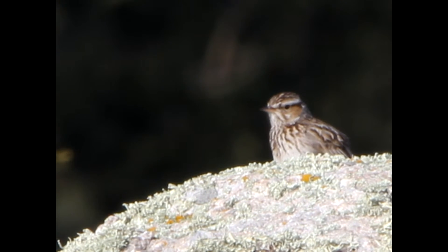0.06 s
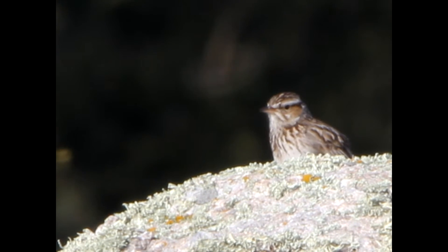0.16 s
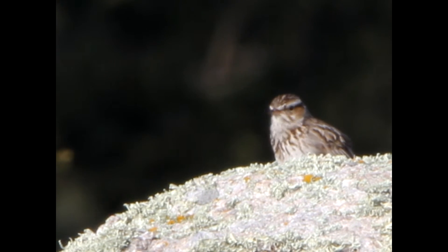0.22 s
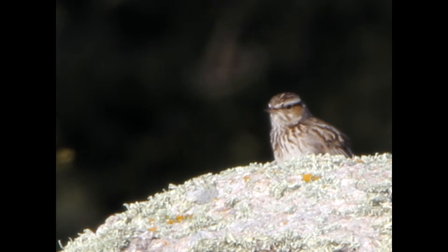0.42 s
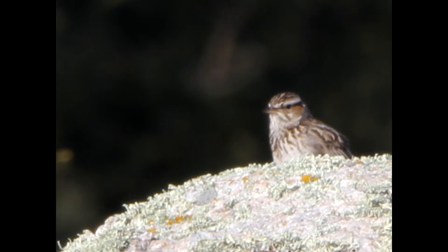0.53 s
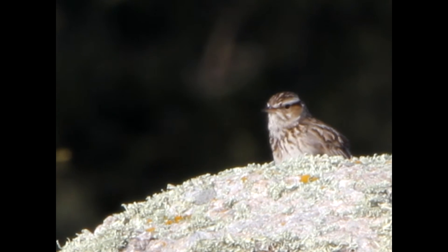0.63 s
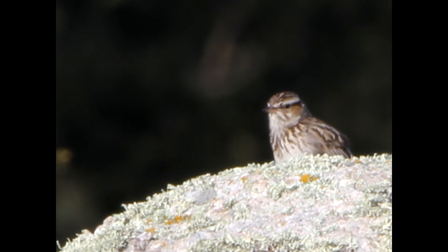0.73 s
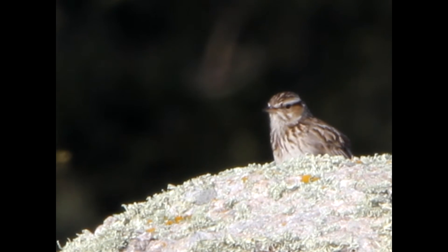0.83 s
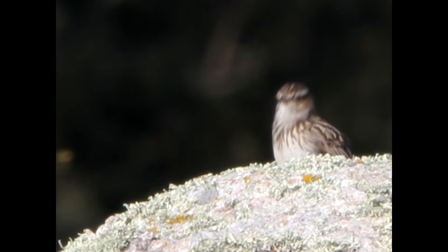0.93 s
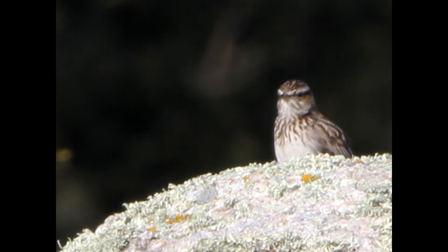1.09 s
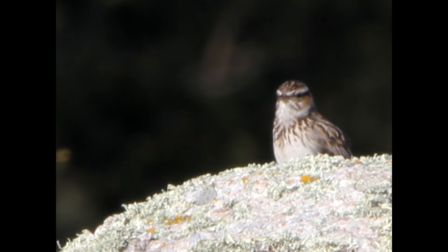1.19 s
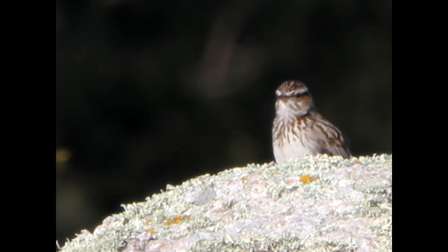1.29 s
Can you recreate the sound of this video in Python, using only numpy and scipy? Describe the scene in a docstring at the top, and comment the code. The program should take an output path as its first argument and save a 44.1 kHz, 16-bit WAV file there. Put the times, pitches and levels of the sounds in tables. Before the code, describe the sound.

A songbird sings short down-slurred whistles outdoors while wind softly bumps the microphone.

```python
"""A woodlark on a rock sings a rising whistle, then a run of down-slurred notes, each led in by a flick.
Each side of its syrinx is an oscillator of gliding pitch; the two sometimes sound together, and in
the opening whistle they mix to give a sum tone. Rocks and bushes scatter faint echoes.
Eddies of wind bump the microphone as pressure pulses amid the rumble of turbulence,
over a low wash of distant air, a steady hiss and a faint hum."""
import sys
import numpy as np
from scipy import signal
from scipy.fft import rfft, irfft
from scipy.io import wavfile
from scipy.ndimage import uniform_filter1d

SR = 44100
rng = np.random.default_rng(int(sys.argv[2]) if len(sys.argv) > 2 else 0)


def transcribe(u):
    """Save the signal u as a 16-bit wav file named by the first command-line argument.

    u: samples, shape (n,) or (channels, n), limited to [-1, 1]; the rate is SR.
    q: integer samples, one column per channel.
    """
    v = np.clip(np.atleast_2d(u).T, -1, 1)
    q = np.round(v * 32767).astype(np.int16)
    wavfile.write(sys.argv[1], SR, q)


N = 59535
T = np.arange(N) / SR
FREQS = np.fft.rfftfreq(N, 1 / SR)

# Whistles of the first side of the syrinx, in the order sung: t/s, f/Hz, level/dB
OPENING_RISE = [(.170, 1997, -74), (.175, 2183, -65.5), (.189, 2700, -66.5), (.203, 3430, -60),
                (.209, 4090, -56), (.214, 4390, -56), (.222, 4480, -53.5), (.232, 4380, -57),
                (.251, 4310, -58.5), (.258, 4300, -76)]
FLICK_A = [(.316, 4350, -74), (.320, 4520, -67), (.327, 3960, -67), (.331, 4700, -75)]
SLUR_A = [(.340, 3600, -70), (.347, 4070, -61), (.355, 3930, -59.5), (.367, 3340, -66.5), (.378, 3170, -66),
          (.386, 3100, -81), (.408, 2990, -68.5), (.426, 2890, -76), (.450, 2780, -69), (.499, 2480, -65),
          (0.5, 2440, -74)]
FLICK_B = [(.658, 4250, -74), (.667, 4200, -67), (.675, 4400, -72)]
SLUR_B = [(.680, 3473, -67), (.688, 4063, -72), (.698, 4190, -57), (.706, 3560, -64.5), (.724, 3170, -66.5),
          (.738, 3020, -77), (.762, 2780, -67.5), (.795, 2628, -69.5), (.832, 2497, -62),
          (.858, 2517, -59.5), (.876, 2570, -67)]
FLICK_C = [(1.004, 3900, -74), (1.015, 3960, -64.5), (1.024, 3630, -59), (1.028, 4500, -65)]
SLUR_C = [(1.037, 3100, -74), (1.043, 3620, -60), (1.048, 3800, -60), (1.064, 3220, -56),
          (1.072, 3070, -66), (1.085, 3000, -64), (1.119, 2782, -60), (1.130, 2720, -68),
          (1.172, 2490, -64), (1.205, 2270, -75)]
FLICK_D = [(1.305, 3930, -71), (1.316, 3890, -57), (1.325, 3480, -57), (1.329, 3950, -54.5),
           (1.332, 4700, -72)]
SLUR_D_ONSET = [(1.340, 2650, -64), (1.345, 3020, -58.5), (1.354, 3300, -67)]
# Whistles of the second side: t/s, f/Hz, level/dB
UPPER_RISE = [(.168, 2500, -76), (.179, 3370, -65.5), (.190, 4250, -65), (.198, 4800, -70)]
UPPER_WARBLE = [(.711, 5000, -72), (.718, 4500, -65), (.723, 4170, -54), (0.7267, 4970, -78),
                (.729, 4400, -59), (.736, 3500, -68)]

# Pressure pulses of the eddies: centre t/s, peak level/dB before filtering, centre-to-peak t/s
EDDY_PULSES = [(.2225, -39, 0.0025), (0.259, -39.5, 0.0032), (0.289, -38, 0.0019), (.334, -26, 0.0018),
               (.368, -24, 0.0018), (.392, -26, .0027), (0.4647, -19.5, .0015), (0.48, -26.5, 0.0028),
               (0.4975, -33.5, 0.0025), (0.534, -26, 0.0028), (0.592, -32, 0.003), (0.659, -31.5, 0.0021),
               (0.676, -31, 0.0017), (.746, -43, 0.0048), (0.834, -45, 0.0017), (0.871, -26.5, 0.0019),
               (0.897, -41, 0.0028), (0.99, -34, .0028), (1.100, -43, 0.0038)]
# Envelope of the turbulence between the eddies: t/s, level/dB
GUST_ENVELOPE = [(0, -63.5), (.19, -67), (.24, -52), (.36, -43), (.47, -47.5), (.56, -49), (.63, -54),
                 (.78, -57), (.89, -56.5), (1.03, -58.5), (1.35, -64.5)]
# Spectral density of the turbulence: f/Hz, relative level/dB
GUST_SPECTRUM = [(15, -35), (35, -13), (70, -0.5), (140, -2), (220, -12.5), (400, -24.5), (900, -51),
                 (3000, -90)]
# Spectral density of the distant air and hiss: f/Hz, relative level/dB
AIR_SPECTRUM = [(20, -14), (60, -3), (130, -1.5), (220, -4.5), (340, -5), (450, -4.5), (650, -9.5),
                (950, -13), (1300, -23), (2000, -25), (4000, -25.5), (7000, -28), (11000, -30),
                (15500, -33.5)]


def woodlark(reedy_db=-8, reedy_until_s=.204, reedy_fade_s=.0018, pure_octave_db=-34, sum_tone_db=-7.5):
    """Two oscillators superpose; in the opening rise, nonlinear mixing adds their sum frequency."""
    first, first_gain = whistle(OPENING_RISE)
    second, second_gain = whistle(UPPER_RISE)
    # A strong second harmonic makes the voice reedy as it starts.
    reedy = amp(reedy_db) * np.clip((reedy_until_s - T) / reedy_fade_s, 0, 1)
    song = first_gain * (np.sin(first) + reedy * np.sin(2 * first))
    song += second_gain * np.sin(second)
    song += amp(sum_tone_db) * np.sqrt(first_gain * second_gain) * np.sin(first + second)
    for note in (FLICK_A, SLUR_A, FLICK_B, SLUR_B, UPPER_WARBLE, FLICK_C, SLUR_C, FLICK_D, SLUR_D_ONSET):
        phase, gain = whistle(note)
        song += gain * (np.sin(phase) + amp(pure_octave_db) * np.sin(2 * phase))
    return song


def whistle(curve, bend_s=.0011, edge_s=.0018, waver=.004, flutter_db=1.5, waver_hz=180):
    """Frequency and amplitude modulation of one side of the syrinx: a note's phase and amplitude."""
    times, hz, db = np.transpose(curve)
    pitch = uniform_filter1d(np.interp(T, times, hz), int(bend_s * SR))  # the syrinx takes time to bend
    pitch *= 1 + waver * drift(waver_hz)
    phase = 2 * np.pi * np.cumsum(pitch) / SR
    gate = np.clip(np.minimum(T - times[0], times[-1] - T) / edge_s + .5, 0, 1)
    rms = amp(np.interp(T, times, db) + flutter_db * drift(waver_hz))
    return phase, np.sqrt(2) * rms * np.sin(gate * np.pi / 2) ** 2


def hillside_echoes(song, echo_db=-17, t60_s=.35, delay_s=.02):
    """Scattering by rocks and bushes: convolution with an exponentially decaying noise response."""
    tail = rng.standard_normal(N) * (T > delay_s) * np.exp(-np.log(1000) * T / t60_s)
    return amp(echo_db) * signal.fftconvolve(song, tail / np.linalg.norm(tail))[:N]


def eddies(low_hz=45.8, top_hz=600):
    """Each eddy pushes, then sucks at the microphone: a bipolar pressure pulse, heard as a soft bump."""
    pressure = np.zeros(N)
    for centre_s, peak_db, width_s in EDDY_PULSES:
        u = (T - centre_s) / width_s
        pressure -= amp(peak_db) * u * np.exp((1 - u ** 2) / 2)  # derivative of a Gaussian
    high_pass = FREQS ** 2 / (FREQS ** 2 + low_hz ** 2)
    low_pass = 1 / np.hypot(1, (FREQS / top_hz) ** 2)
    return irfft(rfft(pressure) * high_pass * low_pass, N)


def gust():
    """Turbulence: random low-frequency pressure fluctuations swell and die away with the breeze."""
    rumble = shaped_noise(spectral_gain(GUST_SPECTRUM, FREQS))
    return rumble * amp(np.interp(T, *np.transpose(GUST_ENVELOPE)))


def distant_air(level_db=-54.5, patch_db=1.0, frame=2048):
    """Broadband noise, a far wash and hiss, whose spectral density drifts slightly in patches."""
    framing = dict(nperseg=frame, noverlap=frame * 3 // 4)
    hz, _, spectra = signal.stft(rng.standard_normal(N), SR, **framing)
    patches = uniform_filter1d(rng.standard_normal(spectra.shape), size=20, axis=0)  # across frequency
    patches = unit_rms(uniform_filter1d(patches, size=8, axis=1))  # across time
    spectra *= spectral_gain(AIR_SPECTRUM, hz)[:, None] * amp(patch_db * patches)
    _, wash = signal.istft(spectra, **framing)
    return amp(level_db) * unit_rms(wash[:N])


def distant_hum(centre_hz=434.2, width_hz=9.5, level_db=-68):
    """Narrow-band noise: neighbouring frequencies beat, so the faint hum wavers."""
    return amp(level_db) * shaped_noise(1 / (1 + ((FREQS - centre_hz) / width_hz) ** 2))


def drift(rate_hz):
    """Low-pass filtering of noise gives smooth random motion."""
    return shaped_noise(np.exp(-(FREQS / rate_hz) ** 2))


def shaped_noise(gain):
    """Linear filtering: white noise takes on the given spectrum, at unit rms."""
    return unit_rms(irfft(rfft(rng.standard_normal(N)) * gain, N))


def spectral_gain(spectrum, hz):
    """Gain from levels interpolated on a logarithmic frequency axis."""
    knots_hz, db = np.transpose(spectrum)
    return amp(np.interp(np.log(hz + 1), np.log(knots_hz), db))


def amp(db):
    """Decibels to amplitude ratio."""
    return 10 ** (np.asarray(db) / 20)


def unit_rms(x):
    """Normalisation to an rms of one."""
    return x / np.sqrt(np.mean(x ** 2) + 1e-30)


def scene():
    """Superposition of the bird, its echoes, the wind and the background in one channel."""
    song = woodlark()
    return (song + hillside_echoes(song) + eddies() + gust() + distant_air() + distant_hum())[None]


def record(dry):
    """Band limiting: a linear-phase low-pass filter removes the highest treble."""
    low_pass = signal.firwin(1023, cutoff=15750, window=("kaiser", 8), fs=SR)
    return signal.oaconvolve(dry, low_pass[None], "same")


dry = scene()
out = record(dry)
transcribe(out)
```